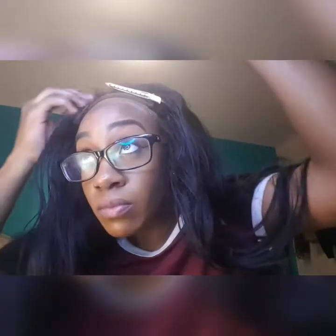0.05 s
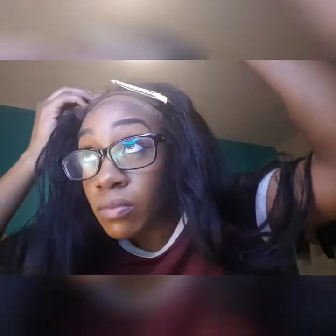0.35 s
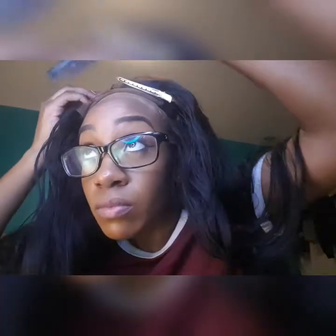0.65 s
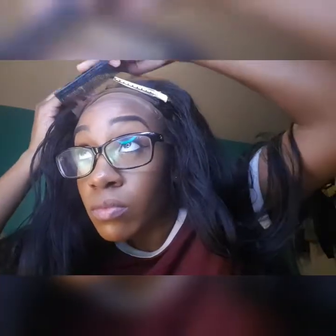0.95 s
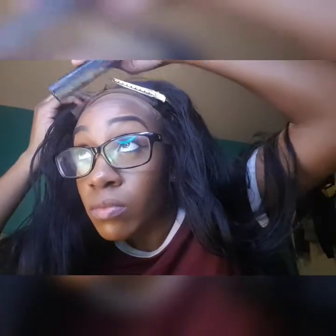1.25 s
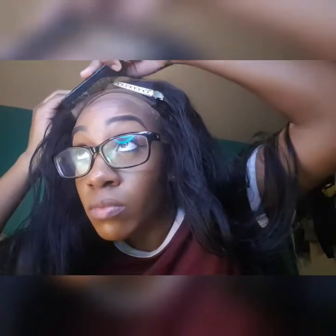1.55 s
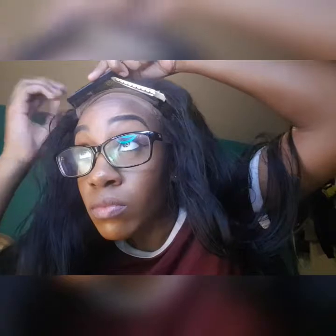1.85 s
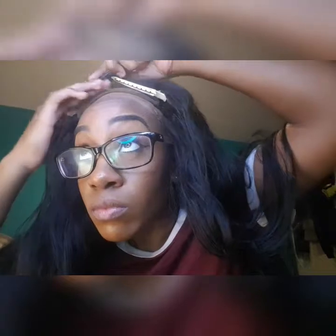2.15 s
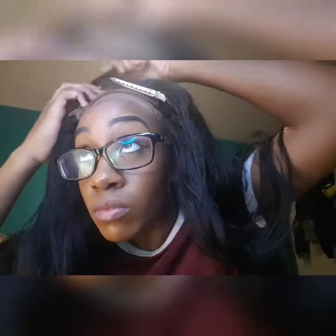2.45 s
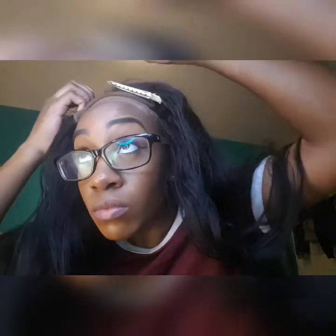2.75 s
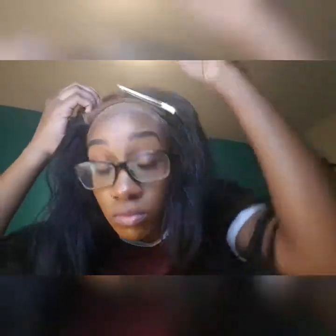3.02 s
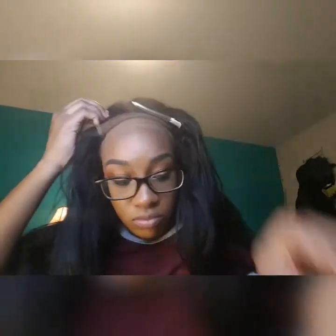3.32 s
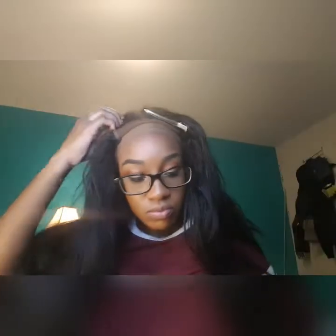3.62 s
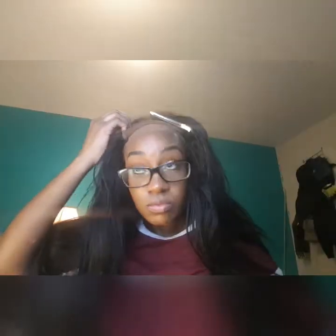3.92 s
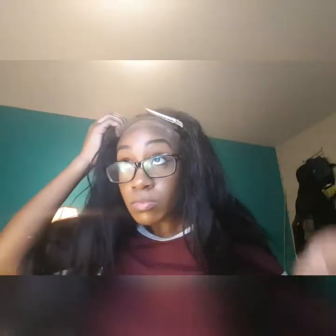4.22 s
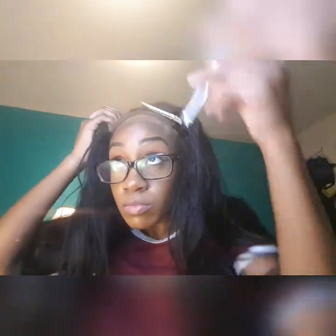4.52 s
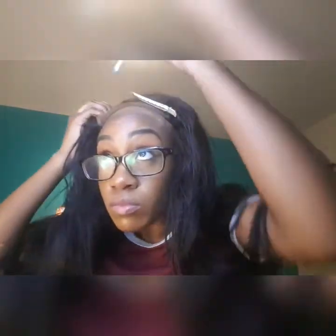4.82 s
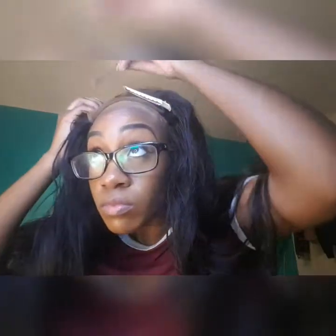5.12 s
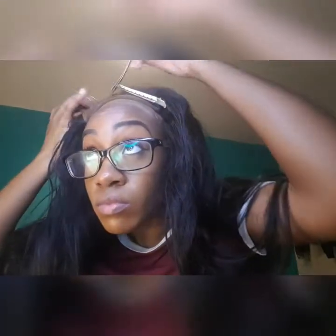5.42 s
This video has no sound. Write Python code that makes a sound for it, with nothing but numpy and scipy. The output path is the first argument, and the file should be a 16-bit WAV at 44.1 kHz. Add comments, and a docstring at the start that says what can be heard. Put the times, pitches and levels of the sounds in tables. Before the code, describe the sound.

Right at the start, a springy metal hair clip snaps shut close to the microphone, with a short ping. Faint strokes of rustling hair follow until about 0.6 seconds. Comb teeth tick lightly near 1 second and in a quick, louder run around 1.8 seconds, then hair rustles with a slight rasp from 2 to 2.5 seconds. A sleeve swishes softly around 3 seconds, followed by more faint rustling. At 3.6 seconds comes the loudest event, slightly to the right: a comb lands on a table, rings briefly and tips over, while metal clips click, knock and slide together. From 3.8 to 4.3 seconds one clip scrapes over the table top in short pulls. A last faint rustle comes at 4.5 seconds. A wavering low hum, ventilation rumble and faint hiss fill the small bedroom throughout, until the end at about 5.6 seconds.

```python
"""A comb and metal hair clips clatter on a table after hair is parted close by, in a small bedroom.
First a springy clip snaps shut, hair rustles as it is rubbed, and comb teeth tick through the strands.
A sleeve brushes past; the dropped comb sets the table ringing, clips knock and slide under the fingers,
and one scrapes over the table top. A low hum, rumbling ventilation and a faint hiss go on throughout."""
import sys
import numpy as np
from scipy import signal
from scipy.fft import rfft, irfft
from scipy.io import wavfile

SR = 44100
rng = np.random.default_rng(int(sys.argv[2]) if len(sys.argv) > 2 else 0)


def int16_out(signal):
    """Quantize to a 16-bit WAV file."""
    q = np.round(np.clip(np.atleast_2d(signal).T, -1, 1) * 32767)
    wavfile.write(sys.argv[1], SR, q.astype(np.int16))


N = 245762
T = np.arange(N) / SR


def from_db(db):
    """Turn decibels into a number to multiply a sound by."""
    return 10 ** (np.asarray(db) / 20)


def rms_one(x):
    """Scale a signal so that its average size (rms) is 1."""
    return x / np.sqrt(np.mean(x ** 2) + 1e-20)


def at_hz(points, hz):
    """Read between the rows of a table, giving each octave equal room."""
    known_hz, values = np.transpose(points)
    return np.interp(np.log(hz + 1), np.log(known_hz), values)


def colour(x, spectrum, resonances=()):
    """Shape the tone with a curve and resonant peaks; white noise keeps its level."""
    size = 2 ** 18
    hz = np.arange(size // 2 + 1) * SR / size
    peaks_db = sum(lift / (1 + (2 * (hz - centre) / width) ** 2) for centre, width, lift in resonances)
    gain = rms_one(from_db(at_hz(spectrum, hz) + peaks_db))
    # minimum phase: the filter rings after a hit, never before it
    cepstrum = irfft(np.log(gain))
    cepstrum[1:size // 2] *= 2
    cepstrum[size // 2 + 1:] = 0
    return irfft(rfft(x, size) * np.exp(rfft(cepstrum)))[..., :N]


def band(x, low_hz, high_hz):
    """Gently keep what lies between two frequencies."""
    edges = [low_hz, min(high_hz, .45 * SR)]
    return signal.sosfilt(signal.butter(2, edges, "band", fs=SR, output="sos"), x)


def stereo_noise(alike, size=N):
    """White noise whose left and right sides are partly alike."""
    mid, side = rng.standard_normal((2, size))
    alike = np.clip(alike, -.99, .99)
    return np.sqrt((1 + alike) / 2) * mid + np.sqrt((1 - alike) / 2) * side * np.array([[1], [-1]])


def drift(rate):
    """A random wobble that changes about rate times a second."""
    return rms_one(signal.sosfilt(signal.butter(2, rate, fs=SR, output="sos"), rng.standard_normal(N)))


def pan(left_db):
    """Gains that make the left side left_db louder than the right."""
    return from_db(np.array([[left_db], [-left_db]]) / 2)


def shade(x, left_db, corner_hz=700):
    """The microphone's body shades the treble on one side; the bass bends round it."""
    bass = signal.sosfilt(signal.butter(1, corner_hz, fs=SR, output="sos"), x)
    return bass + (x - bass) * pan(left_db)


def add(out, time, sound):
    """Mix a short sound in at a time in seconds."""
    start = max(int(time * SR), 0)
    out[:, start:start + sound.shape[-1]] += sound[:, :N - start]


def crack(low_hz, high_hz, fade, alike, rise=0.00057):
    """One hit: many vibrations blur into a burst of noise that falls 60 dB in fade seconds."""
    t = T[:SR // 6]
    envelope = (1 - np.exp(-t / rise)) * from_db(-60 * t / fade)
    burst = band(stereo_noise(alike, size=len(t)), low_hz, high_hz) * envelope
    return burst * np.sqrt(np.sum(envelope ** 2) / np.sum(burst ** 2, axis=1, keepdims=True))


def ring(tones, detune=0):
    """A struck object's tones each fall 60 dB in their fade time; the grip can detune them a little."""
    t = T[:SR // 2]
    out = np.zeros((2, len(t)))
    for hz, db, fade in tones:
        pitch = hz * rng.normal(1, detune)
        phase_per_side = rng.normal(0, min(hz / 3000, 1), (2, 1))
        out += from_db(db - 60 * t / fade) * np.sin(2 * np.pi * pitch * t + phase_per_side)
    return out


def friction(per_s, spread_db, smooth, alike):
    """Rubbing: tiny uneven slips, each half a millisecond long, over a smooth hiss."""
    slipping = rng.random(N) < per_s / SR
    slips = slipping * from_db(spread_db * np.clip(rng.standard_normal(N), -2, 2))
    power = signal.lfilter([1], [1, -np.exp(-2000 / SR)], slips ** 2 + 1e-18)
    return rms_one(stereo_noise(alike) * np.sqrt(power / power.mean() + smooth))


def stroke(start, length, db, attack, release):
    """Loudness of one hand movement: it eases in, holds, then falls 60 dB in release seconds."""
    t = T - start
    ease_in = np.sin(np.pi / 2 * np.clip(t / attack, 0, 1)) ** 2
    return ease_in * from_db(db - 60 * np.clip((t - length) / release, 0, 2))


# tone of the room's boom, the ventilation and the hiss: (frequency [Hz], level [dB])
BOOM_COLOUR = [(15, -31), (30, -20), (40, -13), (46, 0), (54, -0.5), (63, 0), (71, 7), (82, -5), (95, 3),
               (110, -3), (135, -27.5), (300, -66.5)]
VENT_COLOUR = [(50, -25), (85, -1), (97, -16.5), (141, 1.5), (155, -4.5), (172, -12.5), (211, -12.5),
               (268, -10.5), (311, -20), (361, -22), (391, -18), (442, -20.5), (471, -28), (492, -28),
               (700, -41), (910, -53.5), (1540, -120)]
AIR_COLOUR = [(300, -13), (630, 6.5), (800, -1.5), (1000, -5), (1330, -1), (1600, -5.5), (2000, -6),
              (3200, -12), (5000, -18), (7000, -20.5), (9500, -23), (11000, -20), (13000, -16.5),
              (15800, -19)]
def room_tone(boom_db=-53, vent_db=-48.5, air_db=-66):
    """A deep boom, ventilation that makes the room resonate, and faint hiss with two thin whines."""
    # (frequency [Hz], width [Hz], boost [dB])
    room_peaks = [(142, 8.5, 0.85), (216, 14, 2.5), (278, 28, 2.2), (392.7, 12, 4.8), (430, 8.1, 4)]
    whines = [(1210, 7.7, 6), (1800, 8.4, 13)]
    boom = colour(stereo_noise(1.0), BOOM_COLOUR)
    vent = colour(stereo_noise(0.94), VENT_COLOUR, room_peaks)
    air = colour(stereo_noise(0.035), AIR_COLOUR, whines)
    return from_db(boom_db) * boom + from_db(vent_db) * vent + from_db(air_db) * air


# how loud the room's hum is: (time [s], level [dB])
HUM_LEVELS = [(0.0, -48), (0.2, -36), (0.29, -51), (0.46, -39), (0.71, -65), (0.79, -41.5), (1.02, -46),
              (1.12, -32), (1.19, -54), (1.39, -45.5), (2.71, -41.5), (2.76, -49.5), (4.0, -39.5),
              (4.05, -57), (4.13, -44), (5.35, -44.5), (5.4, -63.5), (5.57, -46.5)]
def hum(pitch_hz=66.67, wander_hz=4, flutter=.35):
    """A low hum swells and sinks, fluttering and wandering in pitch."""
    times, db = np.transpose(HUM_LEVELS)
    swell = from_db(np.interp(T, times, db)) * (1 + flutter * drift(rate=6))
    pitch = pitch_hz + wander_hz * drift(rate=7)
    return swell * np.sin(2 * np.pi * np.cumsum(pitch) / SR)


# when the closing hair clip hits and bounces: (time [s])
SNAP_TIMES = [0.0196, 0.0207, 0.031, 0.075, 0.126]
# ringing of its body and its spring: (frequency [Hz], level [dB], fade time [s])
CLIP_TONES = [(229.4, 0.5, 0.59), (454, 4.5, 0.14), (1066, -0.5, 0.091), (1713, 3, 0.06), (4170, -5, 0.066),
              (7560, -21, 0.078), (9350, -11, 0.13)]
SPRING_TONES = [(5450, 0.5, 0.045), (5830, -2, .06), (6020, -2, .07)]
# pitches its body strengthens: (frequency [Hz], width [Hz], boost [dB])
CLIP_PEAKS = [(1034, 180, 5.5), (1880, 440, 5.5), (2830, 180, 11.5), (3980, 230, 9), (5480, 520, 13),
              (7460, 760, 11), (9100, 620, 3)]
def clip_snap(clack_db=-31.5, spring_db=-43, body_db=-42, clack_loss_db_per_s=382,
              spring_loss_db_per_s=202):
    """A hair clip snaps shut in ever weaker bounces; its body rings and its spring pings."""
    clacks, rings = np.zeros((2, 2, N))
    for time in SNAP_TIMES:
        since = time - SNAP_TIMES[0]
        clack = crack(380, 14000, fade=0.024, alike=0.099)
        ping = ring(SPRING_TONES, detune=.006)
        add(clacks, time, from_db(clack_db - clack_loss_db_per_s * since) * clack)
        add(rings, time, from_db(spring_db - spring_loss_db_per_s * since) * ping)
    add(rings, SNAP_TIMES[0], from_db(body_db) * ring(CLIP_TONES))
    tone = [(400, 0), (1800, 4), (3000, -3), (5600, -3.5), (9500, -2), (11500, -15), (15000, -10)]
    return (colour(clacks, tone, CLIP_PEAKS) + rings) * pan(-0.87)


# strokes through the hair: (start [s], length [s], level [dB], rasp compared with hiss [dB])
HAIR_STROKES = [(0.157, 0.14, -75, -20), (0.319, 0.027, -60.5, -23), (0.379, 0.022, -65, -7),
                (0.517, .045, -70, -20), (1.49, 0.15, -75, -18), (2.045, 0.32, -74.5, -20),
                (2.114, 0.048, -70, -1), (2.345, 0.066, -63.5, -1.5), (3.38, 0.07, -70.5, -19),
                (3.513, 0.033, -66.5, -21), (4.495, .03, -73.5, -20.5)]
# tone of the strands' hiss and the scalp's rasp: (frequency [Hz], level [dB])
STRAND_COLOUR = [(700, -22), (1500, -4.5), (2700, 1.5), (4000, -10.5), (6000, -2.5), (8300, -1),
                 (10000, -4.5), (13000, 0), (15800, -5.5)]
SCALP_COLOUR = [(500, -29), (1200, -12), (1600, 1.5), (2000, -2.5), (2500, -0.5), (3000, -3.5), (3600, -15),
                (6000, -21.5), (15800, -34.5)]
def hair_rustle(level_db=-1):
    """Strands hiss under comb and fingers; pressed down, the teeth rasp lower on the scalp."""
    strand_rub = friction(per_s=1000, spread_db=2, smooth=.5, alike=.25)
    hiss = colour(strand_rub, STRAND_COLOUR, resonances=[(6770, 250, 2.1), (8400, 400, 4.3)])
    rasp = colour(friction(per_s=640, spread_db=2, smooth=.3, alike=0.32), SCALP_COLOUR)
    return sum(stroke(start, length, db + level_db, attack=.036, release=.22)
               * (hiss + from_db(rasp_db) * rasp) for start, length, db, rasp_db in HAIR_STROKES)


# ticks of the comb's teeth: (time [s], level [dB])
TOOTH_TICKS = [(1.035, -48), (1.0816, -50.5), (1.7381, -41), (1.7613, -45), (1.776, -34.5), (1.792, -31),
               (1.803, -29)]
def comb_teeth(level_db=1):
    """Comb teeth tick as they flick through strands."""
    out = np.zeros((2, N))
    for time, db in TOOTH_TICKS:
        add(out, time, from_db(db + level_db) * crack(1250, 21000, fade=0.012, alike=0.29, rise=0.0024))
    return colour(out, [(1000, 5), (3500, -5), (5500, -0.5), (8000, 5), (10500, -1), (15000, 2.5)])


# the arm coming down: (start [s], length [s], level [dB])
ARM_MOVES = [(2.779, .28, -54)]
# tone of soft cloth: (frequency [Hz], level [dB])
CLOTH_COLOUR = [(100, -22), (230, 1), (310, -0.5), (450, -5), (700, -18), (1200, -26), (2800, -32),
                (6000, -49), (16000, -54.5)]
def sleeve():
    """A sleeve brushes past with a soft, low swish."""
    movement = sum(stroke(*row, attack=.25, release=0.66) for row in ARM_MOVES)
    return movement * colour(stereo_noise(0.54), CLOTH_COLOUR)


# pulls on a hair clip: (start [s], length [s], level [dB])
PULLS = [(3.572, .01, -59.5), (3.801, 0.13, -40), (3.915, 0.051, -35.5), (4.012, 0.027, -46),
         (4.102, 0.045, -26), (4.165, 0.031, -25), (4.2, 0.019, -31)]
# tone of metal scraping the table: (frequency [Hz], level [dB])
SCRAPE_COLOUR = [(100, -22.5), (250, -10), (420, 0.5), (600, -4.5), (780, -8), (1150, -4.5), (1450, -9.5),
                 (2200, 0.5), (3200, -6.5), (3750, -17), (4600, -11.5), (6500, -20), (8000, -20),
                 (9000, -27.5), (15500, -30.5)]
# pitches that stand out in the scrape: (frequency [Hz], width [Hz], boost [dB])
SCRAPE_PEAKS = [(409, 40, 4.5), (490, 50, 5), (2158, 60, 4), (2345, 60, 4.5), (2481, 60, 6),
                (3070, 90, 5.5), (3270, 120, 11), (4270, 120, 4)]
def clip_drag():
    """A hair clip catches and slips as it is dragged over the table top."""
    pulls = np.max([stroke(*row, attack=.013, release=0.11) for row in PULLS], axis=0)
    scrape = pulls * friction(per_s=364, spread_db=0.5, smooth=0.58, alike=0.59)
    return shade(colour(scrape, SCRAPE_COLOUR, SCRAPE_PEAKS), left_db=-6)


# ringing of the table top and the comb: (frequency [Hz], level [dB], fade time [s])
TABLE_TONES = [(632, 0.5, 0.17), (740, -4.5, .12), (985, -2.5, 0.079), (1260, -4, 0.14), (1800, -1, .07)]
COMB_TONES = [(1602, -1, .18), (1700, -2, 0.081), (2650, -2.5, 0.3), (2920, -7.5, .05), (4100, -4, 0.13),
              (4350, -11, .05)]
def comb_drop(landing_s=3.6166, tip_over_s=3.669, table_db=-30, comb_db=-28.5):
    """The comb lands and sets the table top ringing, then tips over and rings briefly itself."""
    out = np.zeros((2, N))
    add(out, landing_s, from_db(table_db) * ring(TABLE_TONES) * pan(-7))
    add(out, tip_over_s, from_db(comb_db) * ring(COMB_TONES) * pan(-13.5))
    return out


# comb and clips knocking: (time [s], level [dB], hardness [dB], left minus right [dB])
# hardness above 0 is metal on metal, below 0 a dull blow on the table
KNOCKS = [(3.6166, -23, -3, -2.5), (3.6518, -41, 10, -5.5), (3.6693, -31.5, 1, -12.5),
          (3.6826, -30.5, 1, -8.5), (3.7035, -44.5, 10, -6), (3.7106, -28.5, 4, -7.5),
          (3.7205, -26, 5, -10.5), (3.7266, -33.5, 3, 3), (3.7434, -31, 2, -7.5), (3.7509, -41, 7, -5),
          (3.7685, -51, 9, -5.5), (3.7773, -27, 0, -2.5), (3.7847, -37.5, -0.5, -6),
          (3.8013, -43, -7.5, -2), (3.8417, -32.5, 0.5, -12), (3.8471, -41, 11, -4.5),
          (3.8574, -36.5, 7, -14.5), (3.8783, -35, 2, -3), (3.9055, -40.5, -3.5, -10),
          (3.929, -43, -11.5, -4), (3.9695, -49.5, -10, -5), (4.0086, -42, -6, -10.5),
          (4.038, -54, -1.5, -4), (4.104, -45, -10, -14), (4.113, -35.5, -4.5, 3.5),
          (4.1763, -41, -3.5, -3.5), (4.191, -44, -9.5, -2), (4.4002, -70, -9.5, -5)]
# ringing of a hair clip's thin prongs: (frequency [Hz], level [dB], fade time [s])
PRONG_TONES = [(5730, -4, .025), (6283, -2, .025), (7100, -6, 0.038), (7700, 5, 0.039), (8250, -0.5, .035),
               (8860, 0.5, 0.016), (10100, -10, .02)]
# pitches the table and the things on it strengthen: (frequency [Hz], width [Hz], boost [dB])
TABLE_PEAKS = [(422, 42, 2.5), (638, 70, 8.5), (706, 160, 5.5), (960, 220, 2.5), (1234, 53, 10.5),
               (1710, 220, 5), (2500, 190, 0.5), (2970, 120, 9), (3350, 220, 8.5), (8140, 1100, -0.5)]
def clatter(thud_db=1, knock_db=2, click_db=4, tick_db=5, ring_db=1, lag_s=0.0011):
    """Dull blows thud in the table and knock in the comb; hard ones click and ring in the thin metal."""
    out = np.zeros((2, N))
    for time, db, hardness, left_db in KNOCKS:
        thud = from_db(thud_db - hardness) * crack(210, 1400, fade=0.046, alike=0.93)
        knock = from_db(knock_db - 0.99 * hardness) * crack(1380, 5500, fade=0.041, alike=0.31)
        click = from_db(click_db + hardness) * crack(4400, 15000, fade=0.032, alike=0.21)
        tick = from_db(tick_db + 1.2 * hardness) * crack(1500, 16000, fade=0.0032, alike=.4, rise=.0002)
        ping = from_db(ring_db + 1.1 * hardness) * ring(PRONG_TONES, detune=0.038)
        hit = thud * pan(left_db / 2) + (knock + click + tick) * pan(left_db)
        add(out, time + lag_s, from_db(db) * hit)
        add(out, time + lag_s, from_db(db) * ping * pan(left_db))
    tone = [(100, 14.5), (300, 0), (1000, -1.5), (2000, 4), (4500, -0.5), (6000, -1),
            (10500, -2.5), (15000, 0.5)]
    return colour(out, tone, TABLE_PEAKS)


# fingers pushing into the heap of clips: (start [s], length [s], level [dB])
PUSHES = [(3.62, .145, -34), (3.775, 0.072, -34)]
# tone of metal sliding on metal: (frequency [Hz], level [dB])
METAL_RUB_COLOUR = [(100, -20), (250, -5.5), (450, 6), (900, -6.5), (1500, 7), (2200, -2), (3100, 0.5),
                    (4200, -7), (6000, -1), (8000, -7), (10500, -7), (15500, -13)]
def clip_jostle():
    """Hair clips rub over each other under the fingers."""
    pushes = np.max([stroke(*row, attack=0.12, release=.33) for row in PUSHES], axis=0)
    rub = pushes * friction(per_s=260, spread_db=1.5, smooth=.12, alike=0.78)
    return shade(colour(rub, METAL_RUB_COLOUR), left_db=-5.5)


def from_right(x, lag_s=.00027, corner_hz=430):
    """Sound from the table reaches the left side a little later; the bass fills both sides alike."""
    bass = signal.sosfiltfilt(signal.butter(2, corner_hz, fs=SR, output="sos"), x)
    left, right = x - bass
    return np.array([np.roll(left, int(lag_s * SR)), right]) + bass.mean(axis=0)


# how long the room's echo takes to fall 60 dB: (frequency [Hz], fade time [s])
ECHO_FADES = [(200, 0.25), (1000, 0.27), (3000, 0.29), (8000, 0.18), (16000, 0.27)]
def bedroom_echo(x, level_db=-11, first_echo_s=0.0031, build_up_s=0.0037):
    """Many reflections from the walls blur into one short tail."""
    t = T[:SR * 3 // 4]
    edges = np.geomspace(100, 17000, 9)
    tail = np.zeros((2, len(t)))
    for low, high in zip(edges, edges[1:]):
        fade = at_hz(ECHO_FADES, np.sqrt(low * high))
        noise = stereo_noise(alike=np.exp(-low / 700), size=len(t))
        tail += band(noise, low, high) * from_db(-60 * t / fade)
    tail *= np.clip((t - first_echo_s) / build_up_s, 0, 1)
    tail /= np.sqrt(np.sum(tail ** 2) / 2)
    echo = signal.fftconvolve(x.mean(axis=0, keepdims=True), tail, axes=1)[:, :N]
    return from_db(level_db) * colour(echo, [(200, 4), (1000, 3), (3000, 0), (8000, 3.5), (16000, -1)])


def scene():
    """Mix the sounds on the table and at the head with their echo and the room's own sound."""
    on_table = clatter() + comb_drop() + clip_jostle() + clip_drag()
    at_head = clip_snap() + comb_teeth() + hair_rustle() + sleeve()
    return from_right(on_table) + at_head + bedroom_echo(on_table + at_head) + hum() + room_tone()


def record(dry, cutoff_hz=15900):
    """Cut away the very highest treble steeply."""
    return signal.sosfilt(signal.ellip(10, .2, 80, cutoff_hz, fs=SR, output="sos"), dry)


dry = scene()
out = record(dry)
int16_out(out)
```